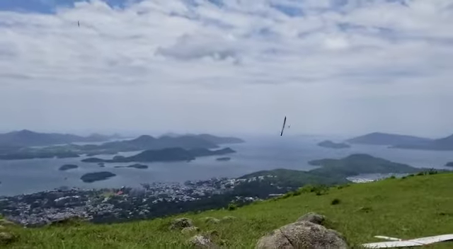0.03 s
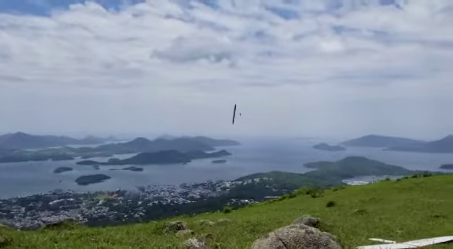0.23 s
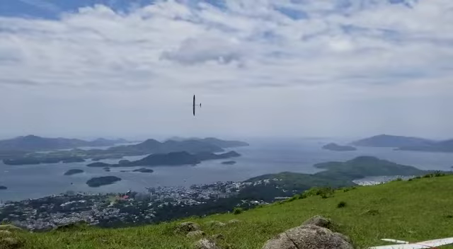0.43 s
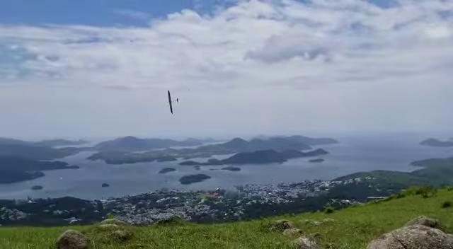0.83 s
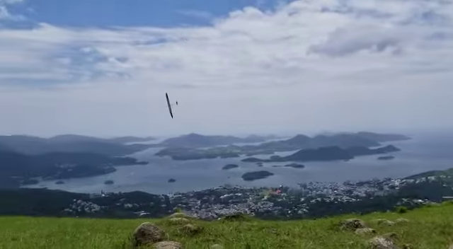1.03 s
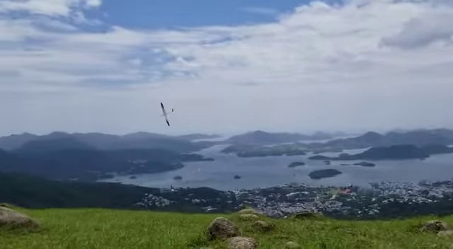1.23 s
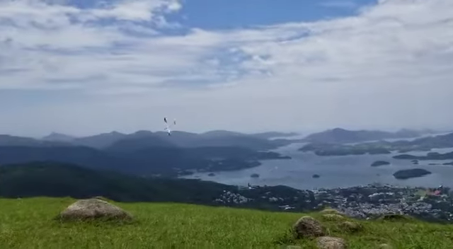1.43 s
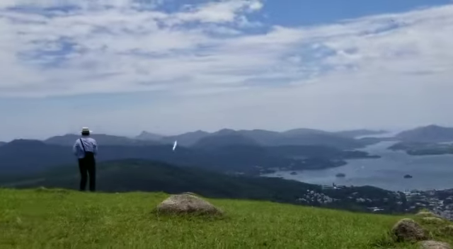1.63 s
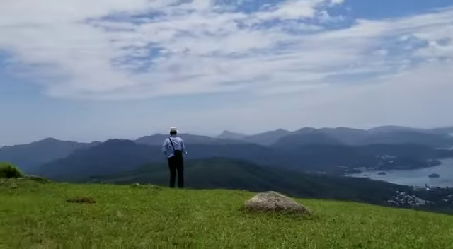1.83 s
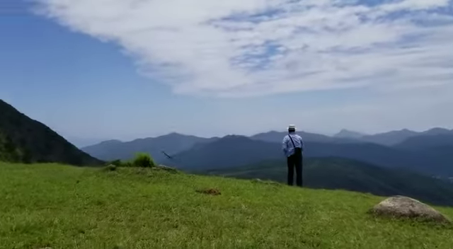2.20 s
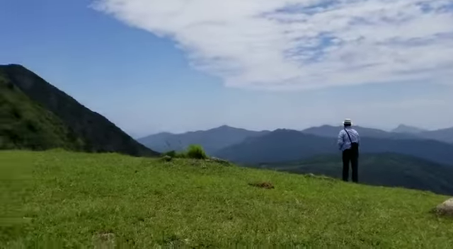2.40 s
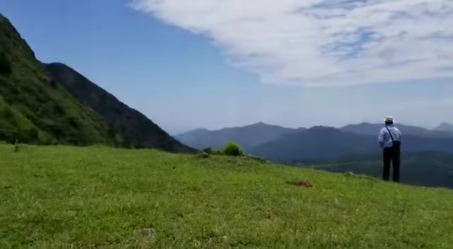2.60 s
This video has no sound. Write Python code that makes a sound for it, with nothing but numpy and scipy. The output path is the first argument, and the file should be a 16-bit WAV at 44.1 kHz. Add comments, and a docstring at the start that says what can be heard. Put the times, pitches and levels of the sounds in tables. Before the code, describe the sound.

A model glider swishes past a grassy hilltop, approaching with a fine hiss and whistling briefly from about 0.5 to 0.9 seconds. Its airy rush peaks near 0.8 seconds, then fades in soft swishes by about 2 seconds. Louder wind buffets the microphone throughout, mostly on the right, with rumble, dull thuds and short rasps, hardest around 0.9 seconds. Grass hisses faintly behind.

```python
"""A model glider swishes past a grassy hilltop: air rushes over the airframe, and an edge tone
whistles briefly as it comes closest. Gusts buffet two microphone ports, mostly the right one:
turbulence rumbles, single eddies strike as dull thuds and short rasps.
Grass hisses behind it all; a limiter ducks the hardest blows."""
import sys
import numpy as np
from scipy import signal
from scipy.fft import rfft, irfft, next_fast_len
from scipy.io import wavfile
from scipy.ndimage import uniform_filter1d, map_coordinates

SR = 44100
rng = np.random.default_rng(int(sys.argv[2]) if len(sys.argv) > 2 else 0)


def master_out(mix):
    """Clip the mix to full scale and print it as 16-bit PCM to the path in sys.argv[1]."""
    frames = np.transpose(np.atleast_2d(mix))
    ceiling = np.clip(frames, -1, 1)
    pcm = np.round(ceiling * 32767).astype(np.int16)
    wavfile.write(sys.argv[1], SR, pcm)


N = 121275
T = np.arange(N) / SR


def amp(db):
    """Decibels to gain."""
    return 10 ** (np.asarray(db) / 20)


def unit(x):
    """Scale to rms 1."""
    return x / np.sqrt(np.mean(x ** 2) + 1e-20)


def along(points, hz):
    """Interpolate (freq_hz, value) points on a log axis."""
    freq_hz, values = np.transpose(points)
    return np.interp(np.log(hz + 1), np.log(freq_hz + 1), values)


def curves(rows):
    """Per-sample curve for each column after time_s."""
    time_s, *columns = np.transpose(rows)
    return [np.interp(T, time_s, column) for column in columns]


def wobble(rate_hz):
    """Smooth random curve, rate_hz knots a second."""
    return map_coordinates(rng.standard_normal(4096), [T * rate_hz], mode="wrap")


def filtered(x, response):
    """Apply the gain response(hz)."""
    size = next_fast_len(N + SR // 2)
    return irfft(rfft(x, size) * response(np.fft.rfftfreq(size, 1 / SR)), size)[..., :N]


def noise(spectrum):
    """Coloured noise, rms 1."""
    return unit(filtered(rng.standard_normal(N), lambda hz: amp(along(spectrum, hz))))


def steadied(x, span_s):
    """Even out the slow chance swells of a noise; rms 1."""
    power = filtered(x ** 2, lambda hz: np.exp(-(hz * span_s) ** 2))
    return unit(x / np.sqrt(np.abs(power) + 0.02))


def swell(peak_s, length_s, front=1):
    """Bell envelope; front is rise time over fall time."""
    return np.exp(-2 * ((T - peak_s) / (length_s * np.where(T < peak_s, front, 1))) ** 2)


def air(spectrum, correlation, patchy_db):
    """Stereo noise with random patches of gain in time and frequency; rms 1."""
    bins = signal.stft(rng.standard_normal((2, N)), nperseg=512)[2]
    patches = uniform_filter1d(rng.standard_normal(bins.shape[1:]), size=4, axis=0)
    patches = uniform_filter1d(patches, size=16, axis=1)
    pair = signal.istft(bins * amp(patchy_db * unit(patches)), nperseg=512)[1][:, :N]

    def mid_side_gains(hz):
        angle = np.arccos(np.clip(along(correlation, hz), -1, 1)) / 2
        return amp(along(spectrum, hz)) * [np.cos(angle), np.sin(angle)]

    mid, side = filtered(pair, mid_side_gains)
    return unit(np.array([mid + side, mid - side]))


def glider():
    """Air rushes over the airframe; the wings throw fine hiss forward, heard on the approach."""
    # rush and hiss envelopes: time_s, level_db
    rush_levels = [(.25, -60.5), (.48, -47), (.58, -51.5), (.8, -42), (.95, -45.5), (1.1, -47.5),
                   (1.32, -53), (1.52, -50.5), (2.02, -65.5), (2.2, -56.5), (2.75, -65.5)]
    hiss_levels = [(0, -50.5), (.2, -48), (.8, -46.5), (.96, -54), (1.35, -72), (2.75, -90)]
    # rush and hiss spectra: freq_hz, density_db
    rush_spectrum = [(500, -6), (1000, -6.5), (1800, 3.5), (4000, -3.5), (6500, -6.5), (9000, -27),
                     (15000, -36)]
    hiss_spectrum = [(1000, -81), (2200, -4), (3200, -0.5), (5500, 4), (7500, 1.5), (9000, -5),
                     (11500, -3.5), (15500, -10)]
    # left-right likeness: freq_hz, correlation
    likeness = [(1400, 0.29), (3000, 0.52), (6000, 0.045)]
    rush_db, = curves(rush_levels)
    hiss_db, = curves(hiss_levels)
    rush = amp(rush_db + wobble(rate_hz=19.66)) * air(rush_spectrum, likeness, patchy_db=3.1)
    return rush + amp(hiss_db) * air(hiss_spectrum, likeness, patchy_db=2.0)


def whistle():
    """Fluttering edge tone of the airframe, strongest just before the closest point."""
    # edge tone: time_s, pitch_hz, level_db
    tone = [(.45, 1430, -66), (.54, 1447, -55), (.69, 1524, -65), (.74, 1500, -50.5), (.855, 1510, -45),
            (.9, 1510, -57)]
    waver_hz, waver_db = 8, 2.5
    pitch_hz, level_db = curves(tone)
    phase = 2 * np.pi * np.cumsum(pitch_hz + waver_hz * wobble(rate_hz=59.2)) / SR
    sounding = (T > tone[0][0]) & (T < tone[-1][0])
    return np.sqrt(2) * sounding * amp(level_db + waver_db * wobble(rate_hz=44.1)) * np.sin(phase)


def swishes():
    """Noise bands swell as the glider banks; each glides up before the closest point, down after it."""
    # half-whistled bands: peak_s, length_s, pitch_hz, half_width_hz, level_db
    bands = [(0.4, .03, 2560, 220, -49.5), (0.484, .055, 2680, 260, -46), (0.481, .035, 4520, 1510, -47),
             (0.71, .08, 3000, 45, -55.5), (.72, .045, 2170, 35, -53), (1.106, 0.065, 1907, 190, -45),
             (1.3, .2, 2000, 70, -56), (1.103, .03, 2900, 700, -47), (1.535, .04, 2950, 250, -53.5),
             (1.955, 0.075, 2690, 150, -53.5)]
    closest_s, sag_per_s2 = 0.98, 0.42
    out = np.zeros(N)
    for peak_s, length_s, pitch_hz, half_width_hz, level_db in bands:
        glide = 1 - sag_per_s2 * (peak_s - closest_s) * np.clip(T - peak_s, -length_s, length_s)
        phase = 2 * np.pi * np.cumsum(pitch_hz * glide) / SR
        i, q = filtered(rng.standard_normal((2, N)), lambda hz: 1 / (1 + (hz / half_width_hz) ** 2))
        band = steadied(i * np.cos(phase) + q * np.sin(phase), span_s=length_s / 2)
        out += amp(level_db) * swell(peak_s, length_s) * band
    return out


def port_wind(flow, eddies, low_cut_hz):
    """Turbulence on one port: lumpy rumble that brightens with the flow; eddies thud and rasp."""
    # wind spectra: freq_hz, density_db
    rumble_spectrum = [(15, -28), (45, -10), (85, 0), (150, -3.5), (230, -9), (330, -47), (500, -60),
                       (900, -110)]
    flutter_spectrum = [(60, -8.5), (160, 0), (260, 3.5), (400, -5), (600, -17), (1300, -53), (3000, -110)]
    thud_spectrum = [(15, -24.5), (50, -14), (110, -3), (260, -9.5), (400, -23), (600, -35), (1200, -90)]
    rasp_spectrum = [(100, -10), (280, 5.5), (500, 2.5), (750, -6), (1200, -20.5), (1800, -32), (2600, -48),
                     (5000, -105)]
    rumble_trim_db, flutter_trim_db, thud_trim_db, rasp_trim_db = -1, -9, 1, 3
    rumble_swing_db, flutter_swing_db, crackle_swing_db = 8.5, 8, 5
    flow_ref_db, flutter_slope = -27.5, 1.635
    flow_db, = curves(flow)
    lumps = np.tanh(wobble(rate_hz=65))
    rumble_db = flow_db + rumble_trim_db + rumble_swing_db * lumps
    rumble = amp(rumble_db) * steadied(noise(rumble_spectrum), span_s=0.087)
    flutter_db = flow_ref_db + flutter_slope * (flow_db - flow_ref_db) + flutter_trim_db
    flutter = amp(flutter_db + flutter_swing_db * lumps) * steadied(noise(flutter_spectrum), span_s=0.015)
    thud_gain, rasp_gain = np.zeros((2, N))
    for peak_s, length_s, thud_db, rasp_db in eddies:
        strike = swell(peak_s, length_s, front=0.85)
        thud_gain += amp(thud_db + thud_trim_db) * strike
        rasp_gain += amp(rasp_db + rasp_trim_db) * strike
    crackle = amp(crackle_swing_db * np.tanh(wobble(rate_hz=170)))
    rasps = rasp_gain * unit(crackle * steadied(noise(rasp_spectrum), span_s=0.0049))
    thuds = thud_gain * steadied(noise(thud_spectrum), span_s=0.009)
    wind = rumble + flutter + thuds + rasps
    edge_fade = np.clip(np.minimum(T, T[-1] - T) / 0.008, 0, 1)
    return edge_fade * filtered(wind, lambda hz: hz ** 2 / np.hypot(hz ** 2, low_cut_hz ** 2))


def grass():
    """Grass hisses evenly in the wind."""
    # hiss spectrum: freq_hz, density_db
    spectrum = [(300, -26), (900, -14), (2000, -12), (3200, -4), (5400, -1.5), (7500, -4.5), (9000, -12),
                (15500, -16.5)]
    level_db, sway_db = -54, 1.14
    gain = amp(level_db + sway_db * wobble(rate_hz=6.5))
    return gain * air(spectrum, correlation=[(1000, 0.13), (5000, 0.05)], patchy_db=1.8)


def scene():
    """Airborne sound is weaker and duller on the right; each port has its own wind."""
    # steady wind pressure: time_s, level_db
    flow_left = [(0, -41), (0.14, -46), (0.19, -24.5), (0.47, -26), (0.59, -33), (0.7, -31), (0.88, -44),
                 (0.97, -22), (1.3, -30), (1.5, -32.5), (1.97, -38.5), (2.08, -38), (2.32, -32.5),
                 (2.45, -49), (2.75, -48.5)]
    flow_right = [(0, -31), (.19, -49), (.26, -27.5), (.47, -26.5), (.6, -31.5), (.68, -24.5), (.79, -32.5),
                  (.89, -17), (1.03, -23), (1.28, -21.5), (1.47, -32.5), (1.7, -31.5), (1.97, -31),
                  (2.17, -26.5), (2.32, -27), (2.39, -34), (2.47, -27), (2.55, -42), (2.63, -29.5),
                  (2.75, -31.5)]
    # eddy strikes: peak_s, length_s, thud_db, rasp_db
    eddies_left = [(0.212, 0.02, -15, -19.5), (0.336, 0.064, -36, -39), (0.424, 0.026, -33, -33),
                   (0.658, 0.04, -23, -41)]
    eddies_right = [(0.324, 0.034, -22.5, -51), (.727, 0.014, -9, -27), (0.812, 0.0043, -17.5, -58),
                    (.874, 0.0085, -2, -14), (0.908, 0.007, -5, -20), (.94, 0.055, -16.5, -26.5),
                    (1.111, 0.01, -14.5, -33.5), (1.157, 0.004, -22.5, -41), (1.203, 0.012, -15, -30),
                    (1.296, 0.02, -16, -19), (1.387, 0.006, -10, -14), (1.425, .008, -19, -25),
                    (1.537, 0.02, -21, -39), (1.761, 0.03, -22.5, -48), (1.906, .016, -19.5, -37),
                    (2.011, .01, -10, -30), (2.046, 0.008, -11, -32), (2.069, 0.016, -10, -28.5),
                    (2.137, 0.019, -14.5, -46), (2.283, 0.018, -15, -48), (2.301, .008, -14, -34),
                    (2.418, 0.0048, -12, -28), (2.441, 0.015, -19, -42), (2.484, 0.011, -17, -46),
                    (2.648, 0.0079, -21.5, -49)]
    # right port response relative to left: freq_hz, gain_db
    right_port = [(500, -10), (2400, -9), (8000, -15)]
    left, right = glider() + whistle() + swishes() + grass()
    right = filtered(right, lambda hz: amp(along(right_port, hz)))
    left += port_wind(flow_left, eddies_left, low_cut_hz=201)
    right += port_wind(flow_right, eddies_right, low_cut_hz=28)
    return np.array([left, right])


def record(dry):
    """A limiter ducks both channels just after the hardest peaks; soft saturation and low-pass follow."""
    limit_db, attack_s, release_s = -6.5, 0.003, 0.012
    ceiling, top_hz = 1.05, 15700
    log_excess = np.log(np.maximum(np.abs(dry).max(axis=0) / amp(limit_db), 1))
    release = np.exp(-T / release_s)
    duck = np.maximum.accumulate(log_excess / release) * release  # decaying peak hold
    attack = np.hanning(int(2 * attack_s * SR))
    limited = dry * np.exp(-np.convolve(duck, attack / attack.sum())[:N])
    saturated = ceiling * np.tanh(limited / ceiling)
    return filtered(saturated, lambda hz: hz < top_hz)


dry = scene()
out = record(dry)
master_out(out)
```